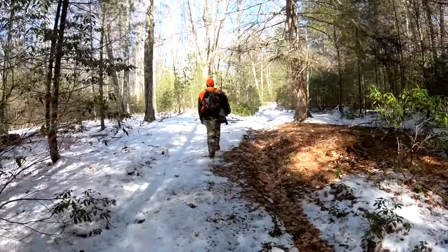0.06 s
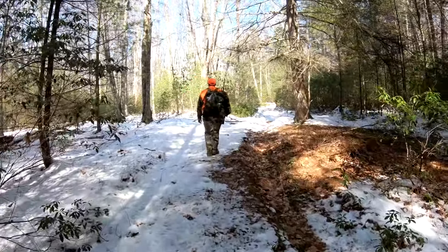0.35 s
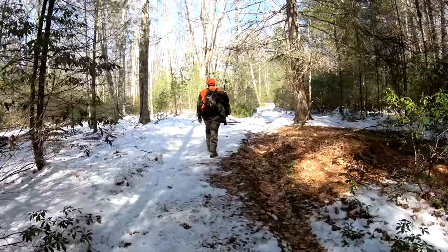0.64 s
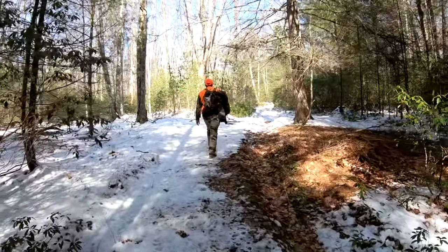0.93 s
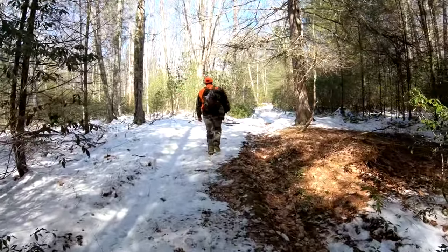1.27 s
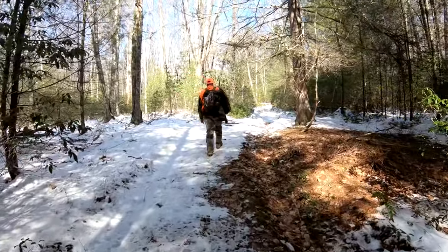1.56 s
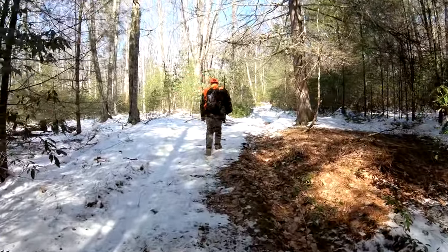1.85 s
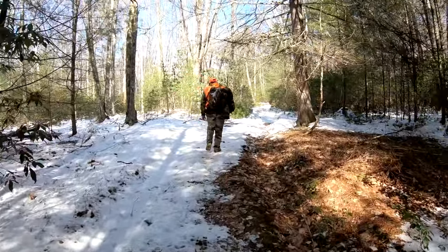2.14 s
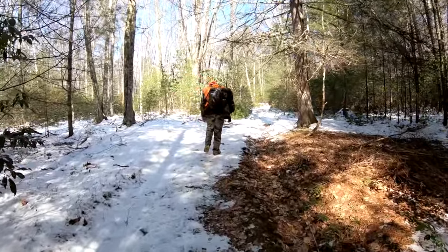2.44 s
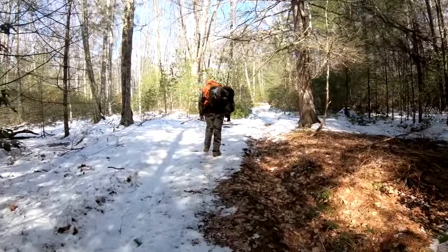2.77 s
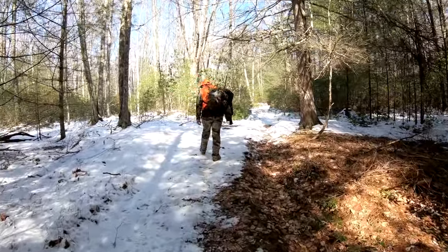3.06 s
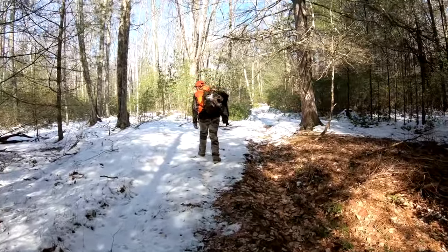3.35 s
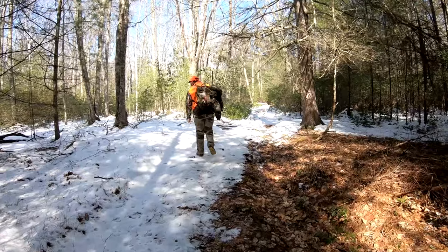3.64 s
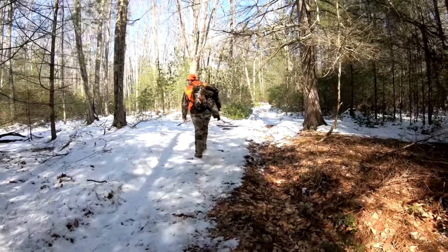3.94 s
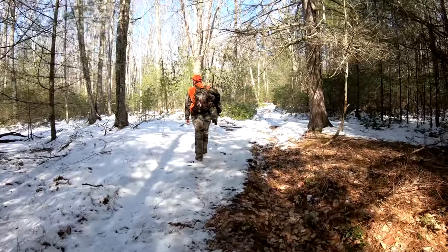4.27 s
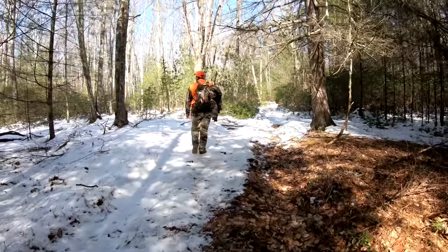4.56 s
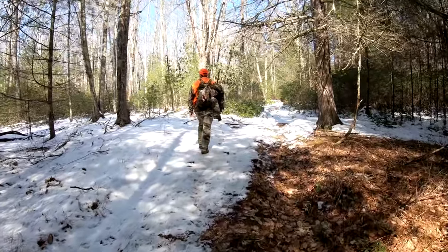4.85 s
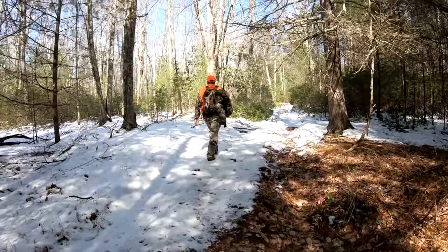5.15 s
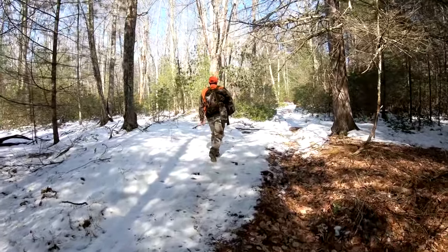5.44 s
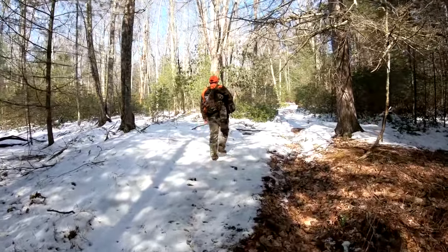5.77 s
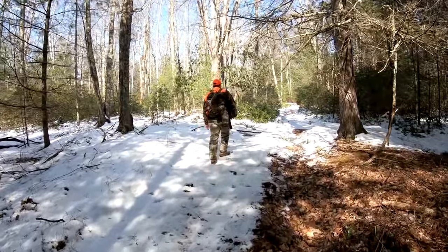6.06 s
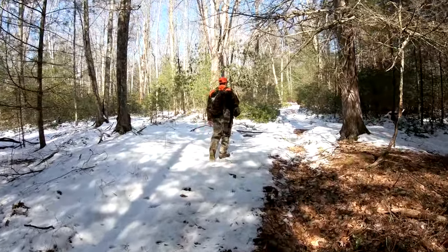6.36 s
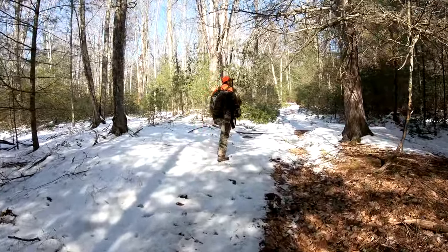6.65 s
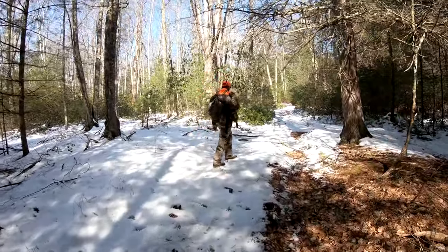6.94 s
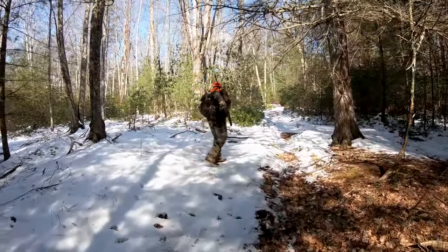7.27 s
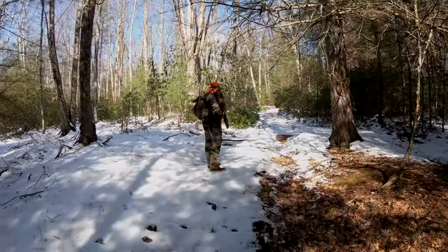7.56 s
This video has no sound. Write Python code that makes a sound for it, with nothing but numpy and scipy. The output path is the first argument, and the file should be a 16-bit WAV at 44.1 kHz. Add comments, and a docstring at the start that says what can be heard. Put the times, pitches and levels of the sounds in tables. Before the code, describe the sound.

Boots crunch through crusty snow at a steady walk on a woodland trail, with small snaps of crust and an occasional rasp over ice. The microphone moves with the walker, picking up hollow knocks from its housing and low puffs of air. Past the middle, a metal fitting clanks once, loud enough to distort, then briefly jingles and scrapes. The steps carry on over a faint hiss.

```python
"""A woodland trail in crusty snow: someone follows a hiker, carrying a camera in a small housing.
Bits of crust snap, each step crushes dense ice grains, and a sole sometimes rasps over ice.
Jolts knock the housing, which booms near 180 Hz; swings push rumbling air over the microphone.
A metal fitting clanks once, hard enough to overload the microphone, taps, jingles and scrapes twice.
A faint hiss lies beneath."""
import sys
import numpy as np
from scipy import signal
from scipy.fft import rfft, irfft, next_fast_len
from scipy.io import wavfile
from scipy.ndimage import uniform_filter1d

SR = 44100
rng = np.random.default_rng(int(sys.argv[2]) if len(sys.argv) > 2 else 0)


def int16_out(signal):
    """Quantize to a 16-bit WAV file."""
    q = np.round(np.clip(np.atleast_2d(signal).T, -1, 1) * 32767)
    wavfile.write(sys.argv[1], SR, q.astype(np.int16))


N = 344421
TIME_S = np.arange(N) / SR


def undb(db):
    """Decibels to gain."""
    return 10 ** (np.asarray(db) / 20)


def unit(x):
    """Scale to rms 1."""
    return x / np.sqrt(np.mean(x ** 2))


def crest(x):
    """Scale the loudest 2 ms to rms 1."""
    power = np.abs(signal.hilbert(x)) ** 2 / 2
    return x / np.sqrt(uniform_filter1d(power, size=88).max())


def add(out, start_s, x):
    """Mix in a short sound."""
    i = max(int(start_s * SR), 0)
    out[i:i + len(x)] += x[:max(N - i, 0)]


def colour(x, spectrum, size=4096):
    """Causal filter through (Hz, dB) points, built from its cepstrum."""
    hz, db = np.transpose(spectrum)
    bin_hz = np.maximum(np.arange(size // 2 + 1) * SR / size, 1)
    gain = undb(np.interp(np.log(bin_hz), np.log(hz), db))
    cepstrum = irfft(np.log(gain))
    cepstrum[1:size // 2] *= 2
    cepstrum[size // 2 + 1:] = 0
    return signal.fftconvolve(x, irfft(np.exp(rfft(cepstrum))))[:len(x)]


def ring(modes, t, detune=0):
    """Decaying modes, each mistuned at random with relative spread detune."""
    return sum(undb(db) * np.sin(2 * np.pi * hz * (1 + detune * rng.standard_normal()) * t)
               * np.exp(-np.log(1000) * t / t60_s) for hz, db, t60_s in modes)


def wander(rate_hz):
    """Smooth random drift, rms 1."""
    span = max(int(SR / rate_hz), 1)
    stairs = np.repeat(rng.standard_normal(N)[:N // span + 1], span)
    return unit(uniform_filter1d(stairs, span)[:N])


def grains(per_s, spread_db):
    """Random clicks of uneven size."""
    size = undb(spread_db * np.minimum(rng.exponential(size=N), 4))
    return unit((rng.random(N) < per_s / SR) * size * rng.choice([-1, 1], N))


def bursts(per_s, spread_db, fade_s):
    """Envelope of random, fast-fading bursts."""
    onsets = np.abs(grains(per_s, spread_db))
    return signal.fftconvolve(onsets, np.exp(-TIME_S[:SR // 50] / fade_s))[:N]


def envelope(start_s, attack_s, hold_s, release_s):
    """Linear rise, hold, exponential decay."""
    t = TIME_S - start_s
    return np.clip(t / attack_s, 0, 1) * np.exp(-np.maximum(t - attack_s - hold_s, 0) / release_s)


# Each row: frequency in Hz, gain in dB.
HISS_SPECTRUM = [(100, 1.5), (700, -10), (1100, -4.5), (2500, -9), (3900, -0.5), (5100, -2), (6200, -9.5),
                 (9000, -19.5), (11000, -26), (13500, -30.5), (15000, -42)]

def hiss(level_db=-49.5):
    """Faint, steady noise."""
    return undb(level_db) * unit(colour(rng.standard_normal(N), HISS_SPECTRUM))


# Each row: frequency in Hz, gain in dB.
SNAP_SPECTRUM = [(150, -21.5), (700, 7.5), (1600, 2), (4400, 2), (6200, -5.5), (11000, -34)]
# Each row: start in seconds, level in dB, length in seconds, favoured pitch in Hz.
SHARP_SNAPS = [(0.008, -23, 0.0023, 1500), (0.351, -28, 0.0018, 5600), (1.474, -22.5, 0.011, 2600),
               (1.602, -33, 0.011, 3030), (2.331, -26.5, 0.0017, 1940), (2.356, -25.5, 0.0069, 2150),
               (3.983, -19.5, 0.0018, 3380), (4.662, -22.5, 0.0086, 3160), (4.949, -26, 0.001, 2500),
               (5.453, -22, 0.0045, 4400), (5.586, -28, .008, 4500), (6.644, -25, 0.0012, 3820),
               (6.719, -26.5, 0.00082, 4000), (6.835, -27.5, 0.0022, 2540), (7.277, -38, 0.00088, 4000),
               (7.357, -30.5, 0.0012, 3400), (7.418, -24.5, 0.0013, 2390), (7.453, -26.5, .003, 4600),
               (7.478, -28, 0.0053, 3830), (7.531, -28, .001, 1500), (7.652, -25.5, 0.0077, 3360),
               (7.696, -32.5, 0.0016, 3550)]

def snaps():
    """Short sharp snaps: breaking crust, plus two light taps of the metal fitting (5.453 and 5.586 s)."""
    out, t = np.zeros(N), TIME_S[:SR // 16]
    for start_s, db, length_s, hz in SHARP_SNAPS:
        burst = rng.standard_normal(len(t)) * np.exp(-np.maximum(t - length_s, 0) / 0.0013)
        resonance = [(hz / 2, 0), (hz, 7), (hz * 2, 0)]
        add(out, start_s, undb(db) * crest(colour(colour(burst, SNAP_SPECTRUM), resonance)))
    return out


# Each row: start and length in seconds, level in dB, relative crush and fizz in dB.
BOOT_SCUFFS = [(0.011, .1, -36.5, -3, -29), (0.149, 0.095, -45, -2.5, -24), (0.326, 0.028, -41.5, -20, 4),
               (0.653, 0.021, -50.5, 0, -43), (0.796, 0.15, -45, -7, -8), (1.011, 0.028, -28.5, -3.5, -15),
               (1.518, 0.096, -40.5, -4.5, -10.5), (1.643, 0.37, -38.5, -10, -12.5),
               (1.888, 0.026, -40, 0, -5), (2.085, 0.033, -37, -5, -10), (2.207, .1, -48.5, -4, -10),
               (2.335, .03, -44, -3, -14), (2.39, 0.097, -44.5, -5.5, -28), (2.741, 0.045, -39.5, -18, -11),
               (2.983, 0.071, -39.5, -4.5, -19), (3.187, .06, -42.5, 1, -12), (3.545, 0.17, -53, -13, -19),
               (3.83, 0.038, -38, -10, -12), (4.086, 0.18, -41, -7.5, -13.5), (4.311, 0.19, -45, -2.5, -8),
               (4.973, 0.15, -42, -20, -10.5), (5.152, .17, -38, 1.5, -15), (5.646, 0.11, -34, -5.5, -9.5),
               (6.279, 0.073, -40.5, -9, -16), (6.715, 0.022, -43, -15, -7), (6.988, 0.053, -38.5, -3, -16),
               (7.226, 0.29, -40.5, -26, -8.5), (7.39, 0.028, -34, -11, -12), (7.573, 0.061, -34, -7, -21),
               (7.781, .03, -43, -12, -30)]
# Each row: start in seconds, heel level in dB, heel sinking and roll to the ball in seconds,
# ball level in dB, relative crush and fizz in dB.
FOOTFALLS = [(0.245, -35.5, 0.042, 0.21, -40.5, -5.5, -10), (0.959, -34, 0.051, .26, -29.5, 0, -12),
             (1.753, -33.5, 0.033, 0.21, -32, 0.5, -10), (2.598, -32.5, 0.058, 0.26, -37, -2, -13),
             (3.703, -28, 0.05, .298, -28.5, -4, -16), (4.613, -31, 0.039, 0.25, -34.5, -2.5, -13),
             (6.002, -37.5, 0.089, 0.15, -40.5, -4.5, -14), (6.633, -38.5, 0.086, 0.281, -34, -6, -12.5),
             (7.129, -39, 0.047, 0.425, -29, -8.5, -6.5)]

def tread():
    """Boot contacts add in power. Returns crunch level, relative crush and relative fizz, in dB."""
    contacts = [(np.full(N, undb(-54.5)), 5.5, -12)]  # constant faint rustle
    for start_s, length_s, db, crush_db, fizz_db in BOOT_SCUFFS:
        scuff = undb(db) * envelope(start_s, 0.01, length_s - 0.01, release_s=0.028)
        contacts.append((scuff, crush_db, fizz_db))
    for start_s, heel_db, sink_s, roll_s, ball_db, crush_db, fizz_db in FOOTFALLS:
        # the heel cuts the crust; loose grains trickle on under it
        heel = undb(heel_db) * envelope(start_s, 0.023, sink_s, release_s=0.051)
        trickle = undb(heel_db - 8) * envelope(start_s, 0.023, roll_s, release_s=0.097)
        contacts.append((np.hypot(heel, trickle), crush_db, fizz_db))
        # the ball bears on duller snow below
        past_roll_s = TIME_S - start_s - roll_s
        ball = undb(ball_db) * np.exp(-np.maximum(-past_roll_s / 0.051, past_roll_s / 0.064))
        contacts.append((ball, crush_db + 2.5, fizz_db))
    crunch = sum(force ** 2 for force, _, _ in contacts)
    crush = sum((force * undb(db)) ** 2 for force, db, _ in contacts)
    fizz = sum((force * undb(db)) ** 2 for force, _, db in contacts)
    return 10 * np.log10([crunch, crush / crunch, fizz / crunch])


def sole_cavities(x, spread_db=2.5, rate_hz=25):
    """Each half octave swells and sinks by itself as the cavities under the sole change."""
    size = next_fast_len(N)
    spectrum = rfft(x, size)
    bin_hz = np.arange(1, len(spectrum) + 1) * SR / size
    band_index = np.clip(2 * np.log2(bin_hz / 300), 0, 9)
    bands = (irfft(spectrum * np.maximum(1 - np.abs(band_index - k), 0), size)[:N] for k in range(10))
    return sum(band * undb(spread_db * wander(rate_hz)) for band in bands)


# Four layers of snow noise. Each row: frequency in Hz, gain in dB.
CRUSH_SPECTRUM = [(120, -9.5), (260, 8.5), (450, 2.5), (740, 3), (980, -3), (1400, -4), (1900, -8),
                  (2800, -37)]
CRUNCH_SPECTRUM = [(900, -35.5), (1500, -4.5), (1900, -2.5), (2400, 0), (3200, 4), (4200, 0), (5100, 2),
                   (5900, -15.5), (6800, -12), (9000, -47.5)]
FIZZ_SPECTRUM = [(4200, -29.5), (5800, 8.5), (6600, 9), (7600, 2.5), (9000, -11.5), (11000, -21.5)]
PACKING_SPECTRUM = [(150, -21.5), (260, 16), (680, -16), (1200, -39)]

def snow(crunch_db, crush_db, fizz_db):
    """Ice grains break in little avalanches under the sole: low crush, crunch and fine fizz."""
    breaks_per_s = 3000 * undb(0.4 * (crunch_db - crunch_db.mean()))  # rises with pressure
    fine = unit(grains(breaks_per_s, spread_db=0) / np.sqrt(breaks_per_s))
    fine += undb(-8) * rng.standard_normal(N)
    lumps = bursts(per_s=55, spread_db=5.5, fade_s=0.0027)
    breaks = fine * undb(1.26 * wander(170)) + undb(-8.5) * unit(lumps) * rng.standard_normal(N)
    crush = unit(colour(breaks, CRUSH_SPECTRUM)) * undb(crush_db)
    crunch = unit(colour(breaks, CRUNCH_SPECTRUM))
    fizz = unit(colour(breaks, FIZZ_SPECTRUM)) * undb(fizz_db)
    # full weight packs the deeper snow
    creak_db = -6.5 + 0.5 * np.minimum(crunch_db + 16.5, 0)
    creak = unit(colour(grains(400, spread_db=-3.5), PACKING_SPECTRUM)) * undb(creak_db)
    # lone plates crack louder in icier crust
    plates = bursts(per_s=70, spread_db=1, fade_s=0.00074) * rng.standard_normal(N)
    crackle = unit(colour(plates, SNAP_SPECTRUM)) * undb(np.minimum(fizz_db, -8) + 0.5)
    return (sole_cavities(crush + crunch + fizz + creak) + crackle) * undb(crunch_db)


# Housing modes. Each row: frequency in Hz, level in dB, T60 in seconds.
HOLLOW_MODES = [(178.6, 11, 0.085), (221, -6.5, 0.069), (277.6, -14, 0.077)]
WALL_MODES = [(437, -3, 0.031), (546, 5.5, 0.022), (695, -2, 0.043), (955, -10.5, 0.026)]
# Each row: frequency in Hz, gain in dB.
TICK_SPECTRUM = [(300, 2), (1000, -11), (1900, 1.5), (2800, -1.5), (4100, 0.5), (5300, -15.5), (7000, -24),
                 (11000, -38)]
# Each row: time in seconds, then boom, clack and tick levels in dB.
JOLTS = [(0.076, -17.5, -24, -25.5), (0.111, -24.5, -26, -37.5), (0.494, -20.5, -27, -37),
         (0.801, -22.5, -42, -39.5), (1.097, -22, -32, -34.5), (1.197, -7, -10, -17),
         (1.719, -22.5, -37.5, -47.5), (1.828, -23.5, -36, -47), (1.987, -24.5, -36, -30.5),
         (2.05, -6.5, -7.5, -19.5), (2.36, -24, -29, -29), (2.624, -25.5, -28.5, -22),
         (2.986, -22, -46, -47.5), (3.045, -11, -16, -24), (3.22, -24, -28.5, -49),
         (3.502, -30, -54, -46.5), (3.684, -24, -36, -36), (3.736, -26, -23, -38.5), (3.791, -24, -29, -41),
         (4.02, -15.5, -28, -25), (4.053, -22.5, -31, -26.5), (4.441, -26, -42, -51.5),
         (4.716, -10.5, -12.5, -13.5), (4.879, -17, -13, -29), (5.128, -15, -31.5, -25),
         (5.161, -24, -22, -35), (5.201, -22, -43, -31.5), (5.354, -3.5, -13, -8), (5.482, -24, -36, -31.5),
         (5.687, -9.5, -30, -20), (5.812, -19, -25, -37.5), (5.851, -19, -18, -19),
         (5.929, -16.5, -34, -29.5), (6.289, -25.5, -32, -32), (6.649, -19, -45, -36),
         (6.721, -20.5, -25, -32.5), (6.795, -25, -48, -36), (7.156, -25, -53, -32.5),
         (7.572, -18, -34, -35), (7.607, -24.5, -38, -47)]

def knocks():
    """A contact tick, the clack of the housing's walls, then a hollow boom that takes a cycle to build."""
    out, t = np.zeros(N), TIME_S[:SR // 5]
    for at_s, boom_db, clack_db, tick_db in JOLTS:
        boom = ring(HOLLOW_MODES, t, detune=0.04) * (1 - np.exp(-(t / 0.007) ** 2))
        clack = ring(WALL_MODES, t, detune=0.055) * (1 - np.exp(-t / 0.0008))
        contact_s = 0.0015 * undb(-0.5 * (tick_db + 16.5))  # softer touch, longer contact
        push = t / contact_s * np.exp(1 - t / contact_s) + undb(-11) * np.exp(-t / 0.037)
        tick = colour(push * rng.standard_normal(len(t)), TICK_SPECTRUM)
        add(out, at_s - 0.001, undb(boom_db) * crest(boom) + undb(clack_db) * crest(clack))
        add(out, at_s - contact_s / 2, undb(tick_db) * crest(tick))
    return out


def murmur(crunch_db):
    """Fits of tiny jolts keep the housing ringing, more so under a step."""
    t, rattle = TIME_S[:SR // 5], 0
    for grip_tuning in (0.865, 0.98, 1.155):
        jolts = np.diff(grains(60, spread_db=2.5), prepend=0)  # push, then release
        boom = ring(HOLLOW_MODES, t * grip_tuning) * np.minimum(t / 0.0042, 1)
        rattle += signal.fftconvolve(jolts, boom)[:N]
    level_db = -39.5 + 0.26 * (crunch_db - crunch_db.mean())
    return unit(rattle * undb(2 * wander(14))) * undb(level_db)


# Each row: frequency in Hz, gain in dB.
AIR_SPECTRUM = [(12, -12), (28, -3.5), (55, 2), (85, -4), (120, -9.5), (400, -68.5)]
# Each row: fastest moment in seconds, level in dB, half length in seconds.
CAMERA_SWINGS = [(0.103, -34, 0.044), (0.945, -32.5, 0.045), (1.08, -36, 0.053), (1.23, -28, 0.027),
                 (2.87, -34, 0.036), (3.02, -38, 0.038), (3.22, -35, 0.032), (4.543, -37.5, .1),
                 (4.725, -23.5, 0.03), (5.223, -30, 0.039), (5.703, -25.5, 0.04), (5.84, -34, 0.055),
                 (5.958, -24, 0.026), (6.625, -33, 0.051), (7.095, -20.5, 0.019), (7.598, -28.5, 0.096)]

def air_rumble(floor_db=-50):
    """Air over the microphone: a little always, a puff per jolt, a swell per swing."""
    air = colour(rng.standard_normal(N), AIR_SPECTRUM) * undb(3.1 * wander(13))
    puff_power = sum((undb(boom_db - 17.5) * envelope(at_s, 0.0011, 0, release_s=0.033)) ** 2
                     for at_s, boom_db, _, _ in JOLTS)
    swing_power = sum(undb(db) ** 2 * np.exp(-((TIME_S - at_s) / half_s) ** 2)
                      for at_s, db, half_s in CAMERA_SWINGS)
    return unit(air) * np.sqrt(undb(floor_db) ** 2 + puff_power + swing_power)


# Each row: start and length in seconds, level in dB, first and last pitch in Hz.
SOLE_SLIDES = [(1.225, 0.14, -33.5, 2880, 2400), (3.045, 0.13, -36, 1690, 2200),
               (3.132, 0.065, -33, 3220, 4100), (3.693, .1, -29.5, 3440, 4500),
               (4.045, .06, -38, 4550, 5900)]

def slides(width_octaves=0.51):
    """A sole rakes the ice: a grainy band that glides as the contact shifts."""
    out = np.zeros(N)
    rake = grains(4000, spread_db=2.5) * undb(1.35 * wander(220))
    for start_s, length_s, db, first_hz, last_hz in SOLE_SLIDES:
        progress = np.linspace(0, 1, int(length_s * SR))
        centre_hz = first_hz * (last_hz / first_hz) ** progress
        clicks, rasp = rake[int(start_s * SR):][:len(progress)], 0
        for hz in 700 * 2 ** (np.arange(11) / 3):
            bandpass = signal.butter(2, [hz / 1.13, hz * 1.13], "bandpass", fs=SR, output="sos")
            weight = np.exp(-(np.log2(hz / centre_hz) / width_octaves) ** 2 / 2)
            rasp += weight * signal.sosfiltfilt(bandpass, clicks)
        add(out, start_s, undb(db) * unit(rasp) * np.sin(np.pi * progress))
    return out


# Each row: frequency in Hz, level in dB.
PRESSED_MODES = [(1680, -14), (2180, 0), (2330, -2), (2790, -4), (3100, -6), (3500, 0), (3830, 0),
                 (4020, -2), (4280, 0), (4510, -1), (4660, -3), (4980, 0), (5130, -5), (5900, -11),
                 (6300, -14)]
# Each row: start in seconds, level in dB, then swell, hold and fade in seconds.
METAL_CONTACTS = [ (5.323, -25, 0.02, 0.0042, 0.003), (5.3505, -5, .003, .002, .0018),
                  (5.357, -24, 0.0051, 0.026, 0.0086), (5.676, -21, 0.04, 0.023, 0.016),
                  (5.916, -30.5, 0.0096, 0.058, 0.0072)]

def fitting_scrapes(t60_s=0.04):
    """Metal on metal chatters through damped modes and shakes the housing; the hardest contact clanks."""
    out, t = np.zeros(N), TIME_S[:SR // 2]
    # neighbouring modes move in opposite directions
    modes = sum((-1) ** k * ring([(hz, db, t60_s)], t) for k, (hz, db) in enumerate(PRESSED_MODES))
    for start_s, db, swell_s, hold_s, fade_s in METAL_CONTACTS:
        slips = rng.standard_normal(len(t))
        chatter = unit(irfft(rfft(slips) * rfft(modes), len(t)))
        crack = undb(max(db + 6, -14)) * unit(colour(slips, TICK_SPECTRUM))
        force = envelope(0, swell_s, hold_s, fade_s)[:len(t)]
        shudder = undb(-29) * signal.fftconvolve(slips * force, ring(HOLLOW_MODES, t))[:len(t)]
        add(out, start_s, undb(db) * (force * (chatter + crack) + shudder))
    return out


# Each row: frequency in Hz, level in dB.
FREE_MODES = [(3862, -1), (4100, 0), (4274, -2), (4549, -3)]
# Each row: start in seconds, level in dB.
JINGLES = [(5.356, -24), (5.450, -32), (5.585, -30)]

def fitting_jingles(t60_s=0.07):
    """The loose fitting bounces ever more lightly, which breaks up its ring."""
    out, t = np.zeros(N), TIME_S[:SR // 2]
    modes = ring([(hz, db, t60_s) for hz, db in FREE_MODES], t)
    for start_s, db in JINGLES:
        bounces = rng.standard_normal(len(t)) * (np.exp(-t / 0.008) + undb(-17) * np.exp(-t / 0.15))
        add(out, start_s, undb(db) * crest(signal.fftconvolve(bounces, modes)[:len(t)]))
    return out


def scene(muffle_hz=9300):
    """Boots, gear and air, muffled by the housing, over the hiss. Mono."""
    crunch_db, crush_db, fizz_db = tread()
    sounds = snow(crunch_db, crush_db, fizz_db) + snaps() + slides() + knocks()
    sounds += fitting_scrapes() + fitting_jingles() + murmur(crunch_db) + air_rumble()
    housing = signal.butter(4, muffle_hz, fs=SR, output="sos")
    return (signal.sosfilt(housing, sounds) + hiss())[None]


def record(dry, top_hz=15200):
    """Clip at full scale, then cut the top."""
    lowpass = signal.ellip(8, 0.2, 70, top_hz, fs=SR, output="sos")
    return signal.sosfilt(lowpass, np.clip(dry, -1, 1))


dry = scene()
out = record(dry)
int16_out(out)
```